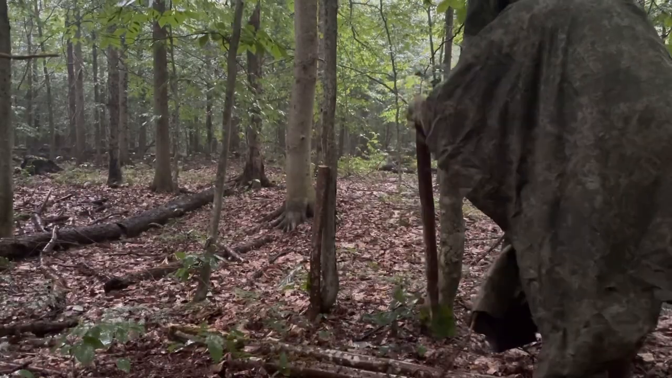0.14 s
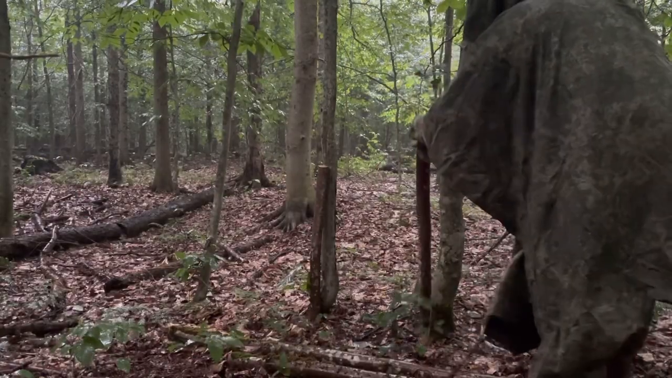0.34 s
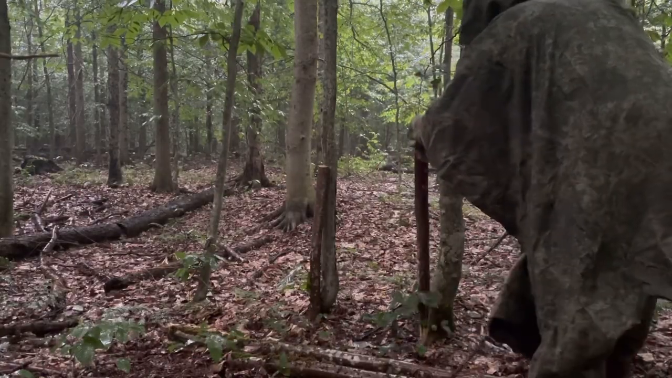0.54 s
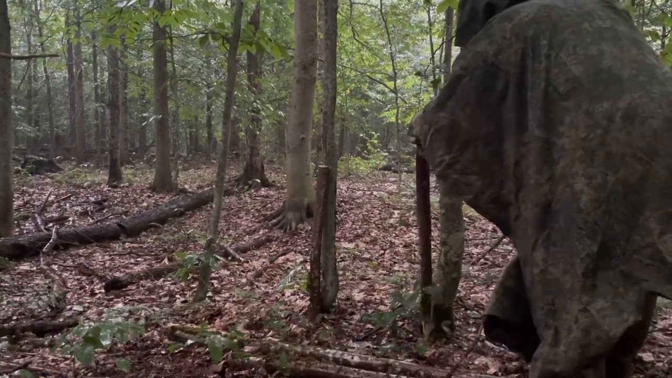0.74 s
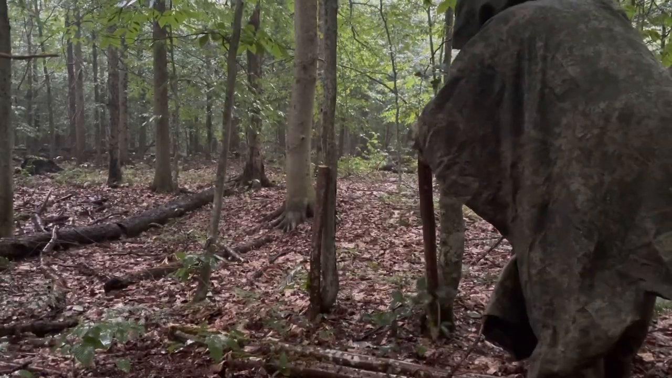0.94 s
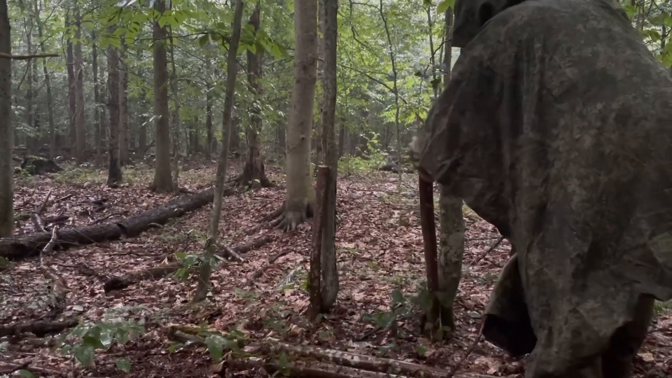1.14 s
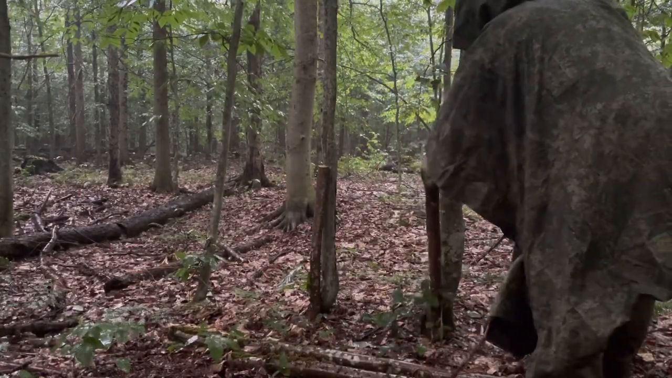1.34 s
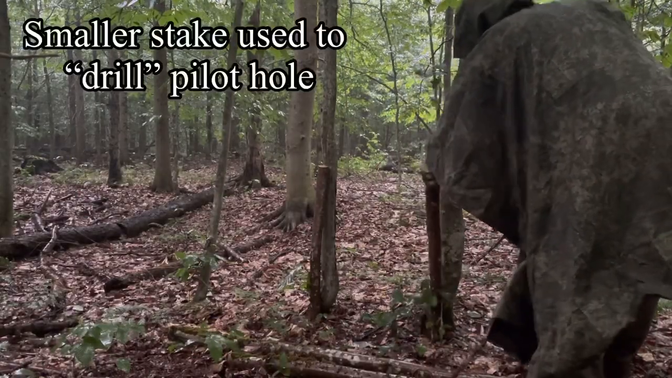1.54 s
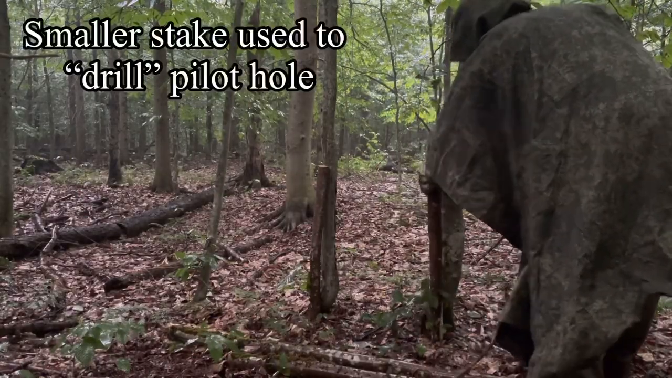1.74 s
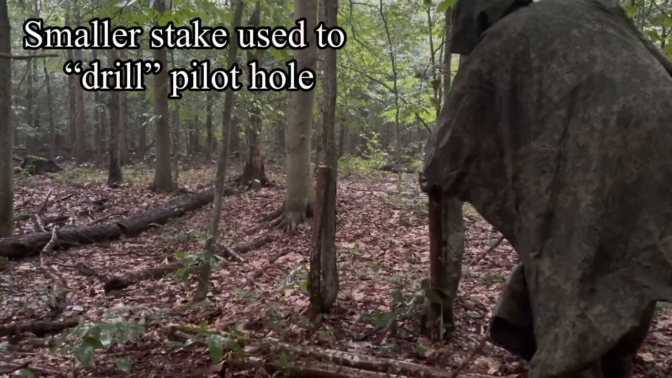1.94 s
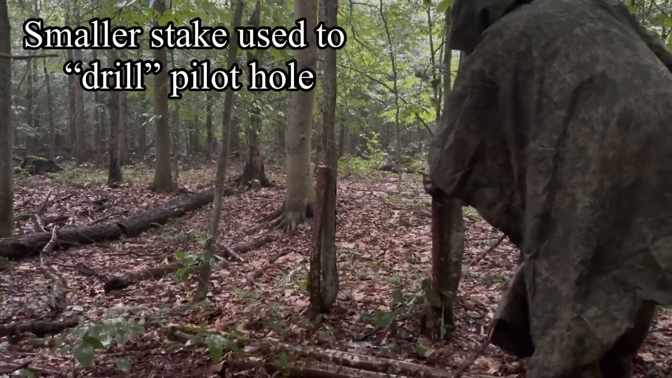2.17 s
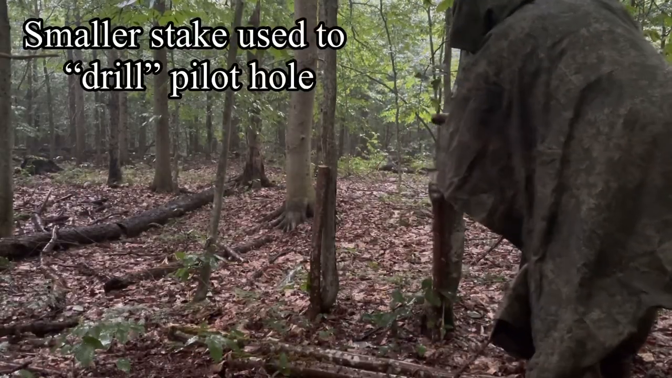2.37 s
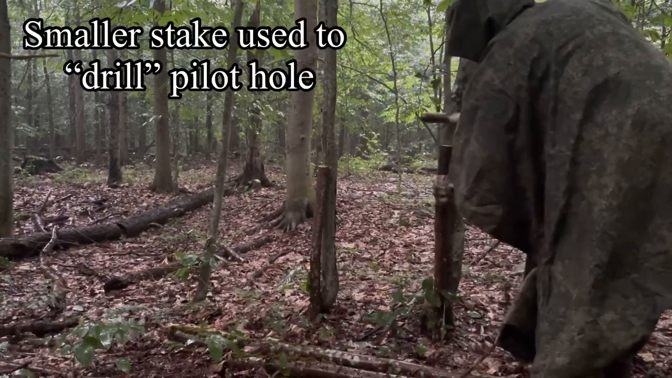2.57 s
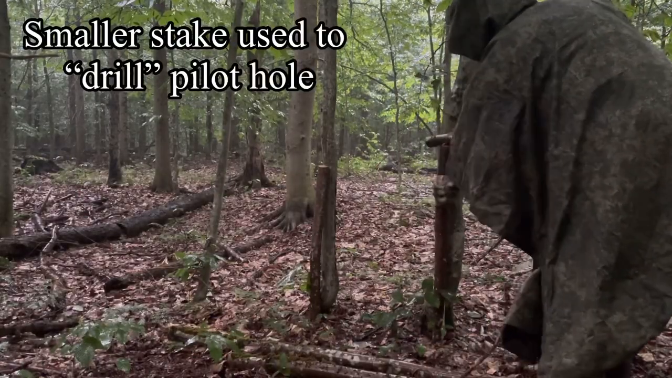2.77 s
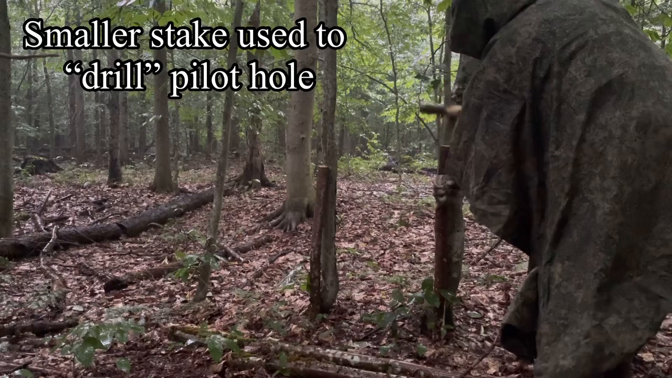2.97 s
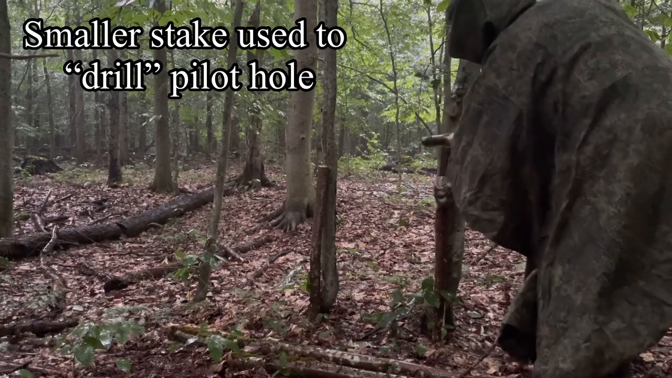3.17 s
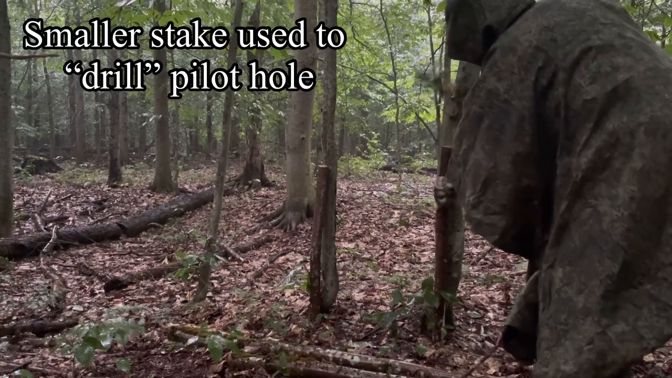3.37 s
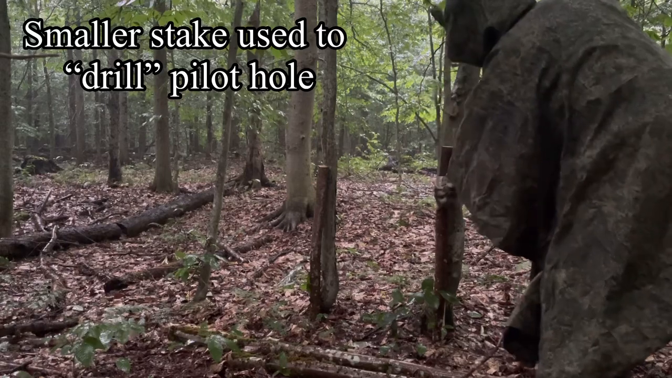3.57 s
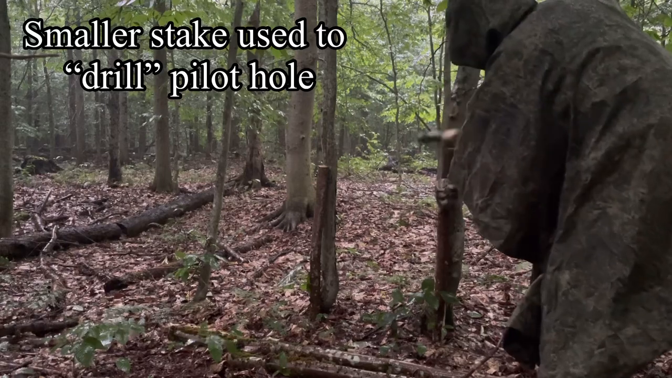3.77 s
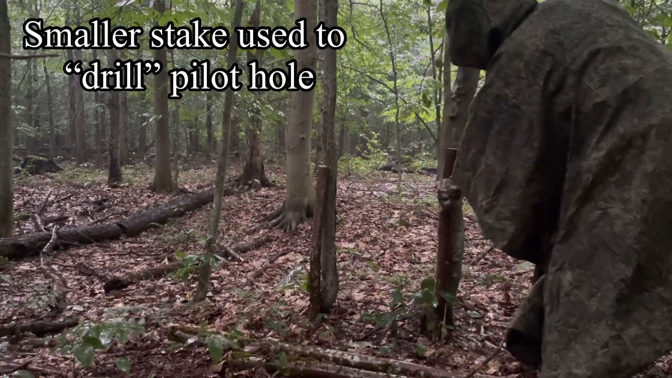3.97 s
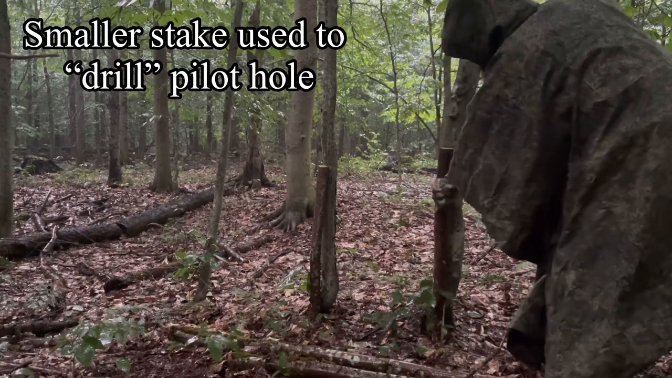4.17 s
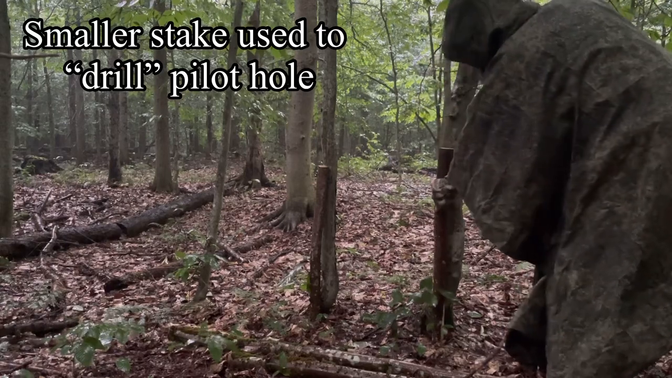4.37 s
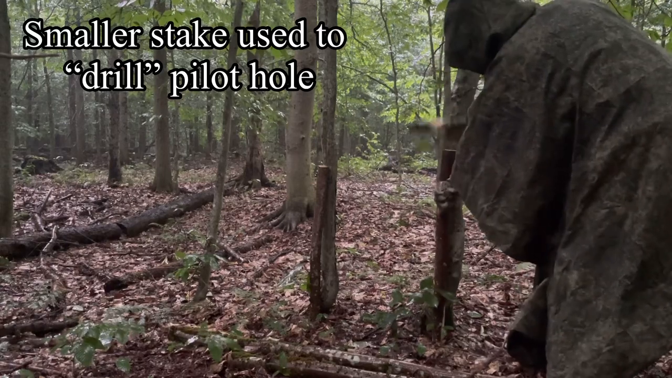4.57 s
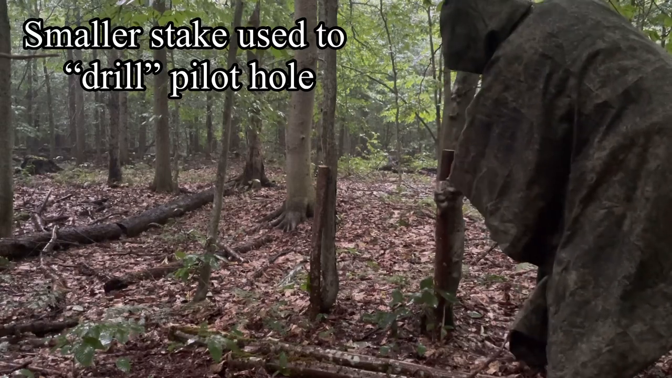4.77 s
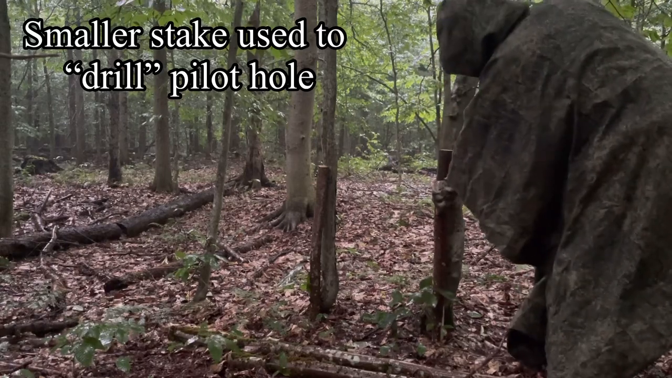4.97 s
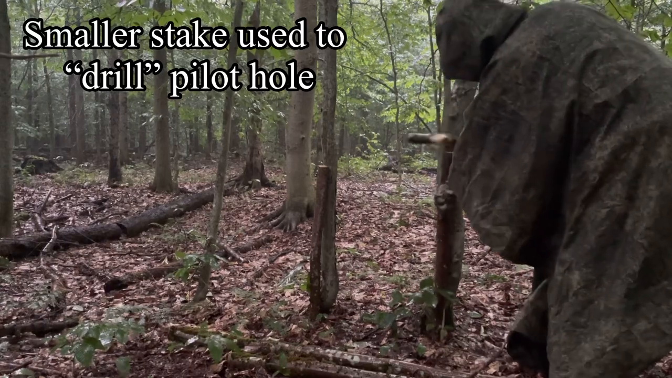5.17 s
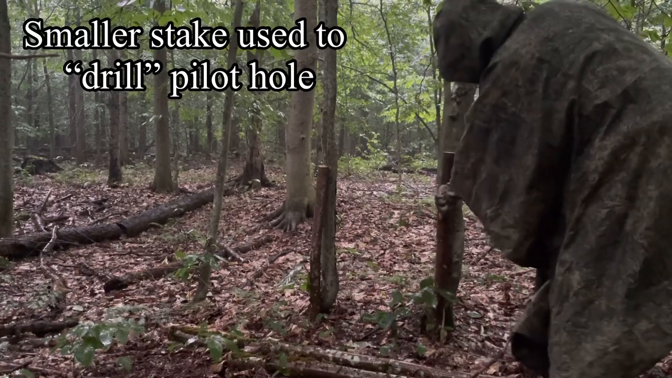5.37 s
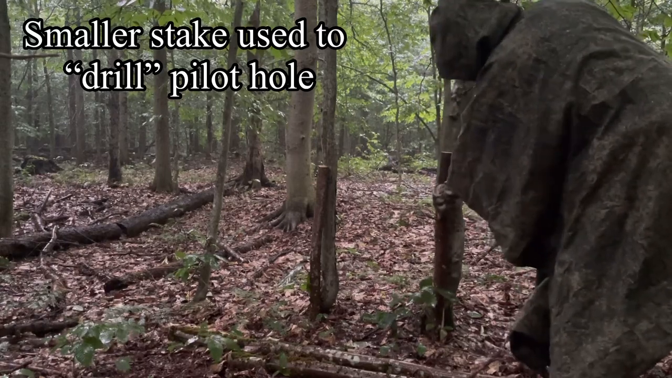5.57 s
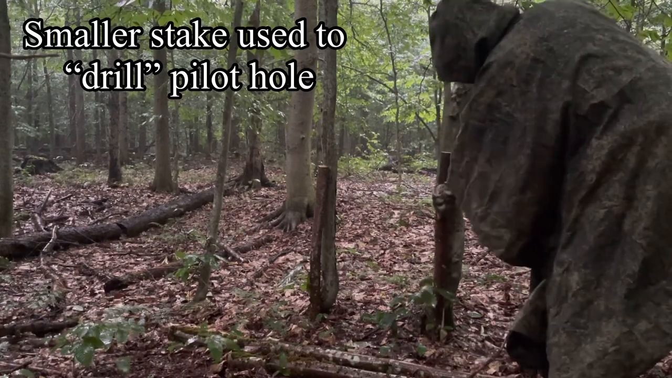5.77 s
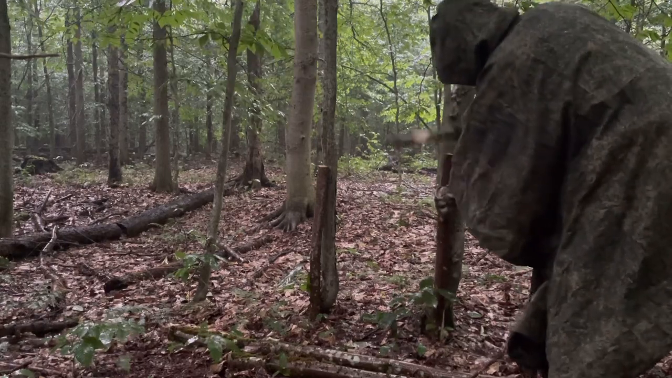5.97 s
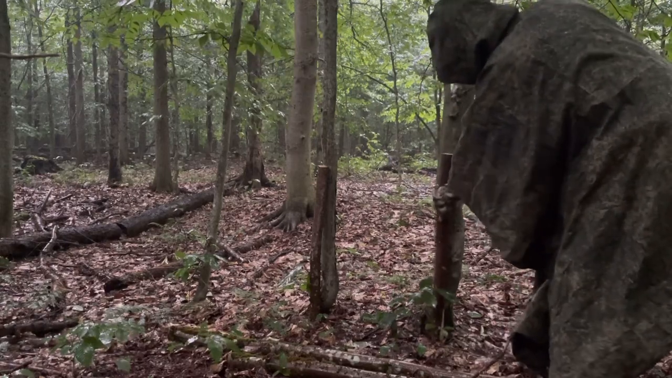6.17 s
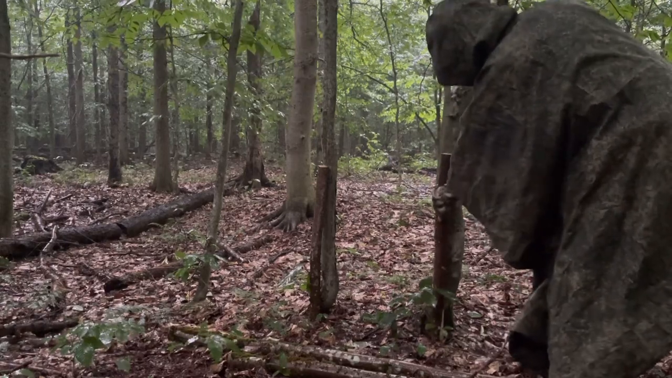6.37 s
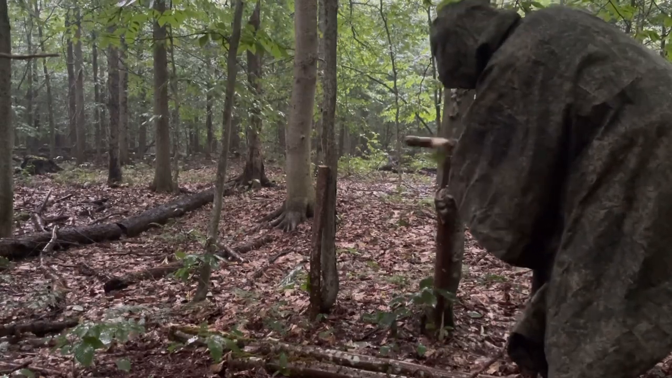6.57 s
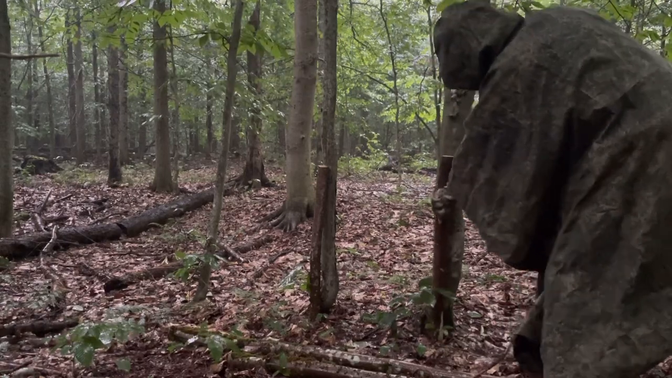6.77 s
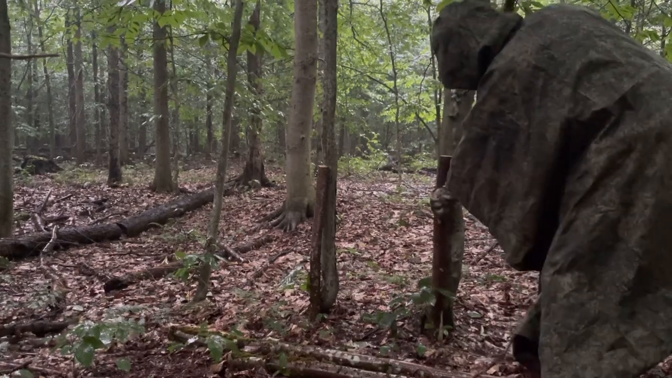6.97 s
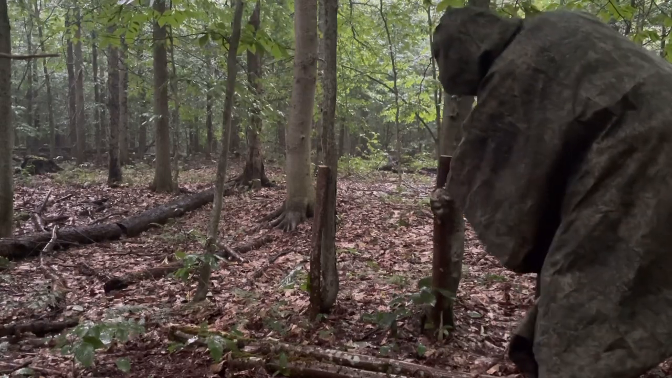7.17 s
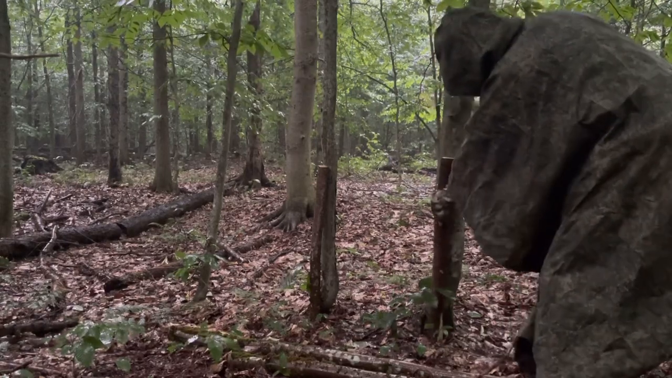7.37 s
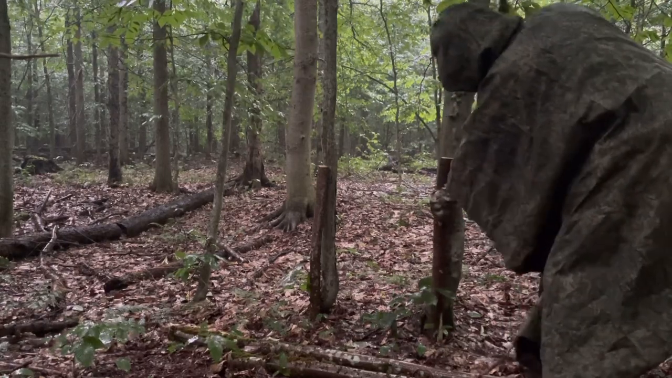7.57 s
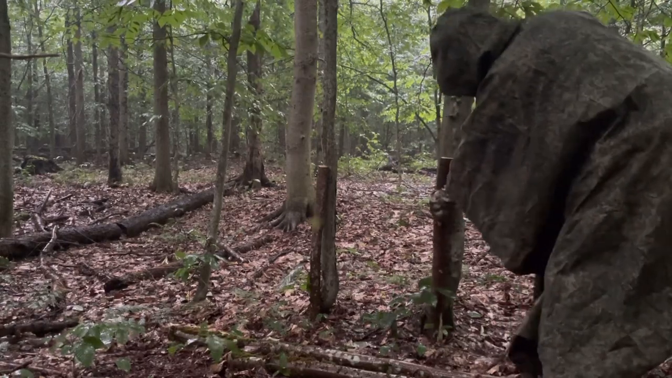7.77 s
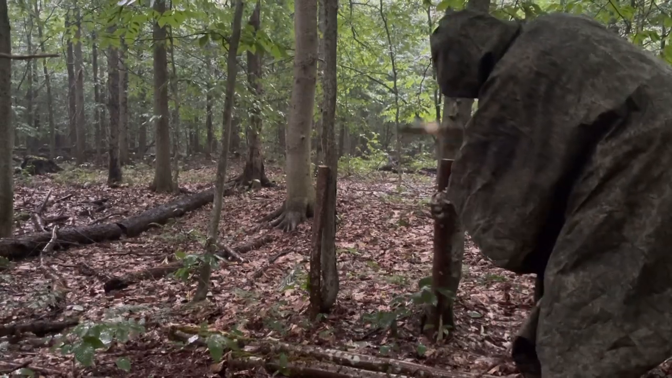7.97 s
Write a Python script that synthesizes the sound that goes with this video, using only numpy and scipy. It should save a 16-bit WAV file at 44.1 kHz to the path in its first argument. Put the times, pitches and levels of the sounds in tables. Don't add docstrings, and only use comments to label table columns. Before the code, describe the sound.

Steady rain hisses in woodland while a stake is softly thumped into soil, then hammered with increasingly hard, hollow wooden knocks.

```python
import sys
import numpy as np
from scipy import signal
from scipy.fft import rfft, irfft
from scipy.io import wavfile
from scipy.ndimage import uniform_filter1d

SR = 44100
rng = np.random.default_rng(int(sys.argv[2]) if len(sys.argv) > 2 else 0)


def wav_record(signal):
    frames = np.transpose(np.atleast_2d(signal))
    bounded = np.clip(frames, -1, 1)
    quanta = np.round(bounded * 32767).astype(np.int16)
    wavfile.write(sys.argv[1], SR, quanta)


def decibels_to_gain(level_db):
    exponent = np.asarray(level_db, float) / 20
    return 10 ** exponent


N = 353241


def evened(x):
    return x / np.sqrt(np.mean(x ** 2) + 1e-20)


def read(points, hz):
    f, value = np.transpose(points)
    return np.interp(np.log(hz + 1), np.log(f + 1), value)


def add(mix, s, sound):
    part = mix[:, round(s * SR):][:, :sound.shape[1]]
    part += sound[:, :part.shape[1]]


def leaned(db):
    return decibels_to_gain(np.multiply.outer([.5, -.5], db))


def coloured(x, points):
    return irfft(rfft(x) * decibels_to_gain(read(points, np.fft.rfftfreq(len(x), 1 / SR))), len(x))


def hiss(shape, mid_colour, side_colour):
    mid, side = rng.standard_normal((2, len(shape)))
    mid = coloured(mid, mid_colour)
    side = coloured(side, side_colour)
    return shape * np.array([mid + side, mid - side]) / mid.std()


def ring(modes, t, rise_s, length=1):
    out = np.zeros((2, len(t)))
    chance = rng.standard_normal((len(modes), 2))
    for (hz, db, t60, lean_db, lag, swing), (detune, stronger_db) in zip(modes, chance):
        turn = 2 * np.pi * hz * (1 + .004 * detune) * t - lag * np.array([[1], [0]])
        fade = decibels_to_gain(db + stronger_db - 60 * t / (t60 * length))
        out += swing * fade * leaned(lean_db)[:, None] * np.sin(turn)
    return out * (1 - np.exp(-t / rise_s))


def drifting(frames, bands, over_bands, over_frames):
    patches = rng.standard_normal((frames, bands)).T
    patches = uniform_filter1d(patches, size=over_bands, axis=0)
    return evened(uniform_filter1d(patches, size=over_frames, axis=1))


# pitch in Hz, level in dB per Hz.
RAIN_COMMON = [(20, -17), (55, 6.5), (140, -1), (200, -1.5), (370, 2.5), (2800, 0.5), (5200, -2.5),
               (6800, -4.5), (8200, -8), (9200, -15), (10200, -15), (10700, -14.5), (13700, -10),
               (15500, -14.5)]
# pitch in Hz, level in dB per Hz.
RAIN_OPPOSITE = [(15, -64), (25, -34), (58, -13), (160, -13), (363, -1.5), (498, -1.5), (599, 4.5),
                 (2440, -1), (3440, -1.5), (4370, -4.5), (6000, -3), (6500, -7), (8240, -1.5), (11600, -15),
                 (14000, -36)]
# pitch in Hz, left over right in dB.
RAIN_LEAN = [(60, -3), (130, -0.5), (290, -2), (640, 0.0), (1410, 0.5), (3100, 2), (6820, 1.5),
             (15000, -2.5)]
# pitch in Hz, wander of the level in dB.
PORT_CANCELLING = [(7400, 0), (9000, 2.6), (10200, 3), (11000, 0)]
# time in seconds, level in dB.
RAIN_LEVEL = [
    (0.0, -36),
    (7.79, -37),
    (8.01, -38),
]


def rain(drops_per_s=2500, spread_db=3.5, drop_share=.3, patchy_db=.7, flicker_db=.5):
    drops = decibels_to_gain(spread_db * np.minimum(rng.exponential(1, (2, N)), 5)) * rng.choice([-1., 1.], (2, N))
    drops *= rng.random((2, N)) < drops_per_s / SR
    far = rng.standard_normal((2, N))
    drive = np.sqrt(1 - drop_share) * far + np.sqrt(drop_share) * evened(drops)
    hz, t, (mid, side) = signal.stft(drive, SR, nperseg=1024, noverlap=768)
    patches = drifting(len(t), len(hz), 14, 10)
    flicker = evened(uniform_filter1d(rng.standard_normal(len(t)), size=3))
    wander = drifting(len(t), len(hz), 22, 14)
    mid = mid * decibels_to_gain(read(RAIN_COMMON, hz)[:, None] + read(PORT_CANCELLING, hz)[:, None] * wander)
    side = side * decibels_to_gain(read(RAIN_OPPOSITE, hz) - 0.12)[:, None]
    z = np.array([mid + side, mid - side]) * leaned(read(RAIN_LEAN, hz))[:, :, None]
    z = z * decibels_to_gain(patchy_db * patches + flicker_db * flicker)
    pair = signal.istft(z, SR, nperseg=1024, noverlap=768)[1][:, :N]
    s, level_db = np.transpose(RAIN_LEVEL)
    return decibels_to_gain(3.0 + np.interp(np.arange(N) / SR, s, level_db)) * evened(pair)


# start in seconds,
# level in dB, left over right in dB.
TICKS = [(1.06, -26, 10), (1.2067, -27, 0.0), (3.1757, -32, 0.0), (3.7075, -28, 0.0), (3.7262, -27, 0.0),
         (3.7713, -33, 0.0), (5.1225, -17, 0.0), (6.1694, -36, 0.0), (6.4961, -25, 0.0), (6.5115, -20, 0.0),
         (7.1692, -20, -1.0), (7.5333, -34, 14), (7.8271, -20, 0.0)]
# pitch in Hz, level in dB per Hz.
TICK_COLOUR = [(6000, -40), (10000, -12), (13500, 0), (15800, -3), (17000, -30)]


def port_ticks():
    out, t = np.zeros((2, N)), np.arange(SR // 20) / SR
    for s, db, lean_db in TICKS:
        noise = evened(coloured(rng.standard_normal(len(t)), TICK_COLOUR))
        tick = noise * decibels_to_gain(db - 1.0 - 60 * t / 0.0086) * (1 - np.exp(-t / 0.00034))
        add(out, s, tick * leaned(lean_db)[:, None])
    return out


# start in seconds, level in dB, pitch in Hz, left over right in dB.
DRIPS = [(1.169, -34, 406, 1.0), (1.979, -34, 433, -6), (2.211, -30, 730, 0.0), (2.228, -31, 890, 0.0),
         (2.259, -28, 1520, 0.5), (2.559, -25, 2910, 1.0), (3.511, -27, 1200, 3), (3.586, -16, 3700, 1.0),
         (5.968, -41, 396, 1.0), (6.275, -32.5, 368, -3), (6.314, -29, 805, 0.5), (6.929, -33, 816, -2)]


def leaf_drips():
    out, t = np.zeros((2, N)), np.arange(SR // 20) / SR
    for s, db, hz, lean_db in DRIPS:
        fade = decibels_to_gain(db - 1.0 - 60 * t * hz / 24) * (1 - np.exp(-t / 0.00053))
        plip = fade * np.sin(2 * np.pi * hz * t * (1 + 3 * t))
        add(out, s, plip * leaned(lean_db)[:, None])
    return out


# start in seconds, level in dB, pitch in Hz,
# time to fall by 60 dB in seconds.
THUMPS = [
    (1.49, -23.5, 127, 0.07),
    (1.843, -31.5, 128, 0.056),
    (4.174, -31, 215, 0.05),
    (7.544, -43, 85, 0.2),
]


def thumps():
    out, t = np.zeros((2, N)), np.arange(SR // 5) / SR
    for s, db, hz, t60 in THUMPS:
        sinking_hz = hz * (0.54 + 1.73 * np.exp(-t / 0.0061))
        swing = np.sin(2 * np.pi * np.cumsum(sinking_hz) / SR)
        fade = decibels_to_gain(db + 8.5 - 60 * t / t60) * (1 - np.exp(-t / 0.005))
        add(out, s, fade * swing * leaned(-2.3)[:, None])
    return out


# pitch in Hz, level in dB per Hz.
SWISH_COMMON = [(1000, 3), (4000, -1), (7000, -1), (9500, -12), (13000, -3.5), (15500, -4), (17000, -30)]
# pitch in Hz, level in dB per Hz.
SWISH_OPPOSITE = [(1000, -29), (5000, -31), (8000, 10), (11000, -5), (14000, -15)]


def swish(t):
    swell = np.exp(-((t - 1 / 20) / 0.0099) ** 2)
    return hiss(swell, SWISH_COMMON, SWISH_OPPOSITE)


# pitch in Hz, level in dB per Hz.
CRACK_COMMON = [(1500, -4), (3000, 4.5), (5000, -3), (8000, -10), (10000, -14), (13000, -1.5), (15500, 1),
                (17000, -42)]
# pitch in Hz, level in dB per Hz.
CRACK_OPPOSITE = [(1500, -7), (3000, -5), (5000, -12), (8000, 1), (10000, -5), (13000, -18), (17000, -40)]


def crack(t):
    return hiss(decibels_to_gain(-60 * t / 0.013) + decibels_to_gain(-5.0 - 60 * t / 0.071), CRACK_COMMON, CRACK_OPPOSITE)


# pitch in Hz, level in dB, time to fall by 60 dB in seconds,
# left over right in dB, lag of the left port in radians, direction and size of the first swing.
CLUB_LOW = [(570, 4.5, 0.036, -2.5, 1, 0.72), (451, -4.5, 0.057, 2, 0.49, -1.21),
            (1080, 1.5, 0.027, -8, .6, 1)]
CLUB_UPPER = [(1694, -2, 0.028, -3.5, 0.44, 0.89), (2016, -11.5, 0.084, -1, .2, -0.66),
              (2316, -7, 0.02, -2, .1, 0.85)]
CLUB_TOP = [(3530, -13.5, 0.021, .6, .1, 1), (3590, -36, 0.13, .6, .1, 0.78),
            (3760, -14, 0.023, .6, .1, -1.1), (4400, -20.5, 0.036, .6, 0.61, 0.91)]


def club(t, force_db, club_db, square, firm):
    grip = 1 / (1 + (t / 0.0086) ** 4)
    low = decibels_to_gain(club_db) * ring(CLUB_LOW, t, 0.00078)
    upper = decibels_to_gain(force_db - 0.3) * ring(CLUB_UPPER, t, 0.00017)
    top = decibels_to_gain(club_db - 1.5 + 1.2 * square - 2 * firm) * ring(CLUB_TOP, t, 0.00026)
    return grip * (low + upper) + top


# pitch in Hz, level in dB,
# time to fall by 60 dB in seconds, left over right in dB, lag of the left port in radians,
# direction and size of the first swing.
STAKE_RING = [(1057, -0.5, 0.095, -4.5, 0.86, 0.88), (979, -30.5, 0.15, -10, 0.78, -0.74),
              (1135, -12.5, 0.058, -22, .8, -1)]
STAKE_SIDEWAYS = [(1202, -8.5, 0.11, 3, .5, 0.86)]
STAKE_BENDING = [(413, -2.5, 0.11, -0.5, 0.36, 1)]
STAKE_HUM = [(1837, -18.5, 0.37, -2, 0.62, 0.64), (1877, -18, 0.17, -2, .55, -1.01)]


def stake(t, force_db, stake_db, bend_db, square, firm):
    length = max(1.18 + .12 * square, 0.87)
    main = decibels_to_gain(stake_db) * ring(STAKE_RING, t, 0.00055, length)
    sideways = decibels_to_gain(force_db - 3 + 1.5 * firm) * ring(STAKE_SIDEWAYS, t, 0.0023)
    bending = decibels_to_gain(bend_db) * ring(STAKE_BENDING, t, 0.00084)
    hum = decibels_to_gain(stake_db + 8 * firm) * ring(STAKE_HUM, t, .002)
    return main + sideways + bending + hum


# pitch in Hz, level in dB, time to fall by 60 dB in seconds,
# left over right in dB, lag of the left port in radians, direction and size of the first swing.
FOOT = [(177, -5, 0.036, -2, .05, 1), (264, -10, 0.041, -3, .1, 1)]


def foot_jolt(t):
    return ring(FOOT, t, 0.0018)


def soil_wave(t, high_hz=70, low_hz=50, fall_s=.03, delay_s=0.053, echo_s=.058):
    hz = low_hz + (high_hz - low_hz) * np.exp(-np.maximum(t - delay_s, 0) / fall_s)
    arrival = 1 / (1 + np.exp(-(t - delay_s) / 0.0035))
    late = decibels_to_gain(-14.5 - 60 * t / 0.28) * arrival * np.sin(2 * np.pi * np.cumsum(hz) / SR)
    late += decibels_to_gain(-12.5) * np.interp(t - echo_s, t, late, left=0)
    rumble_colour = [(30, -30), (70, 1.5), (200, -11.5), (330, -50)]  # (Hz, dB per Hz)
    rumble = evened(coloured(rng.standard_normal(len(t)), rumble_colour))
    swell = np.exp(-((t - .025) / 0.035) ** 2) * (1 - np.exp(-(t / .012) ** 2))
    return (late + decibels_to_gain(-27) * swell * rumble) * leaned(-1.5)[:, None]


# start in seconds, force in dB, stake ring in dB, club ring in dB, stake bending in dB.
BLOWS = [
    (2.6684, -29, -38, -32.5, -27.5),
    (3.1247, -22, -18.5, -25.5, -25),
    (3.7281, -21.5, -15, -15.5, -34),
    (4.4491, -14.5, -11.5, -11, -22.5),
    (5.1147, -8.5, -14.5, -9, -14),
    (5.8351, -8, -15, -8.5, -16),
    (6.519, -6.5, -11, -11, -18),
    (7.1888, -5, -8.5, -11, -17),
    (7.8472, -5.5, -13, -10.5, -16),
]


def blows():
    out, t = np.zeros((2, N)), np.arange(SR // 3) / SR
    thin = signal.butter(2, 200, "high", fs=SR, output="sos")
    for s, force_db, stake_db, club_db, bend_db in BLOWS:
        square = bend_db + 16
        firm = s - 7.5
        crack_db = -11 + force_db + .35 * club_db
        swish_db = -18 + 0.59 * crack_db
        wood = stake(t, force_db, stake_db, bend_db, square, firm) + club(t, force_db, club_db, square, firm)
        wave = decibels_to_gain(1.25 * force_db + 1.5) * soil_wave(t)
        add(out, s - .004 - 1 / 20, decibels_to_gain(swish_db) * swish(t))
        add(out, s - .0008, decibels_to_gain(crack_db) * crack(t))
        add(out, s, decibels_to_gain(1.5) * (signal.sosfilt(thin, wood) + wave))
        add(out, s + 0.0065, decibels_to_gain(force_db - 0.1) * foot_jolt(t))
    return out


# pitch in Hz, time to fall by 60 dB in seconds.
WOODS_DECAY = [(100, 0.12), (500, 0.21), (1500, 0.33), (4000, 0.17), (12000, 0.22)]


def woods(x):
    taps = np.zeros((2, SR // 2))
    at = np.arange(400, SR // 2 - 40, 40) + rng.integers(0, 40, (2, (SR // 2 - 401) // 40))
    np.put_along_axis(taps, at, rng.choice([-1., 1.], at.shape), axis=1)
    hz, t, z = signal.stft(taps, SR, nperseg=256)
    fade = decibels_to_gain(-60 * t / read(WOODS_DECAY, hz)[:, None])
    tail = signal.istft(z * fade, SR, nperseg=256)[1]
    tail = tail / np.linalg.norm(tail[0])
    return signal.fftconvolve(x.mean(axis=0)[None], tail, axes=1)[:, :N]


def scene():
    hits = blows()
    return rain() + port_ticks() + leaf_drips() + thumps() + hits + decibels_to_gain(-17.0) * woods(hits)


# pitch in Hz, width in Hz, depth in dB.
NOTCHES = [(5640, 140, -4.5), (7670, 125, -7)]


def camera_body(dry):
    hz = np.fft.rfftfreq(N, 1 / SR)
    body_db = sum(db * np.exp(-((hz - at_hz) / width) ** 2) for at_hz, width, db in NOTCHES)
    return irfft(rfft(dry) * decibels_to_gain(body_db) / (1 + (36 / (hz + 1)) ** 4), N)


def low_pass(x):
    return signal.sosfilt(signal.butter(12, 15800, fs=SR, output="sos"), x)


def record(dry):
    heard = camera_body(dry)
    ceiling = .9
    rounded = heard / (1 + abs(heard / ceiling) ** 4) ** (1 / 4)
    hz = np.fft.rfftfreq(N, 1 / SR)
    limited = irfft(rfft(rounded) / (1 + (hz / 16000) ** 60), N)
    return low_pass(limited)


dry = scene()
out = record(dry)
wav_record(out)
```